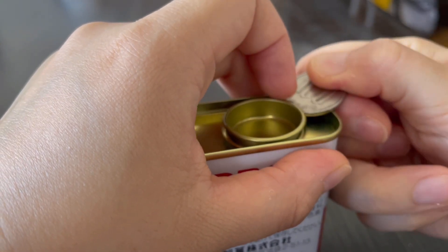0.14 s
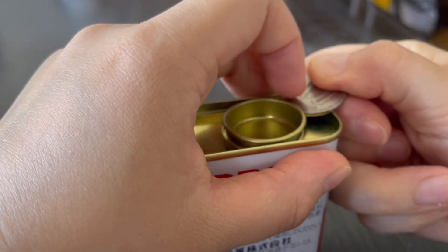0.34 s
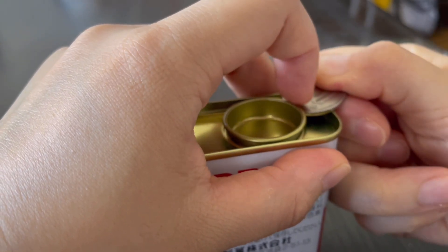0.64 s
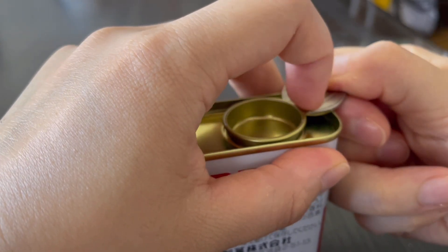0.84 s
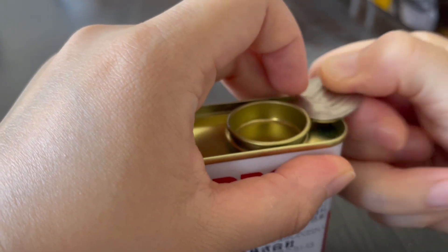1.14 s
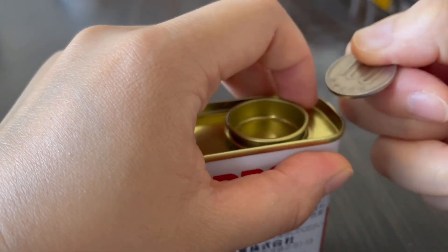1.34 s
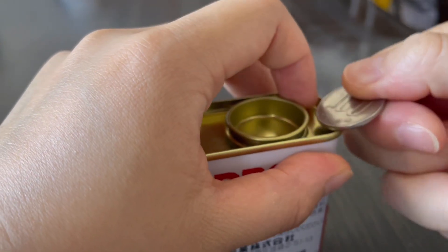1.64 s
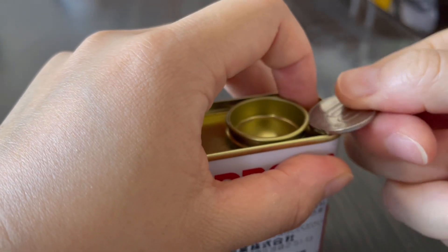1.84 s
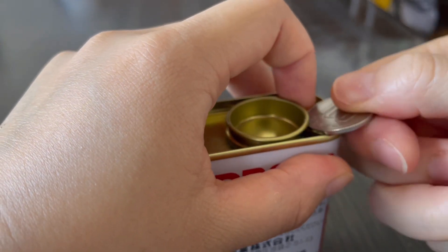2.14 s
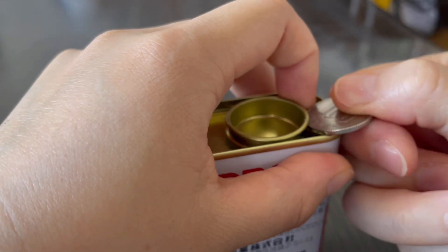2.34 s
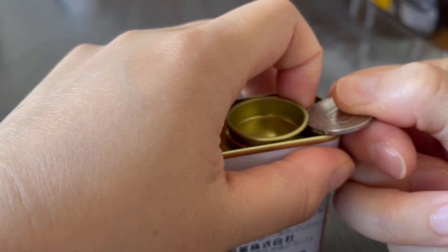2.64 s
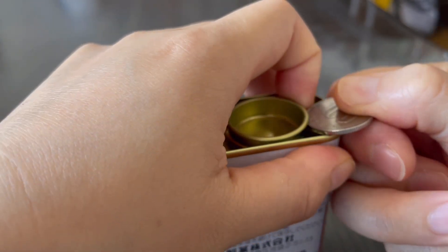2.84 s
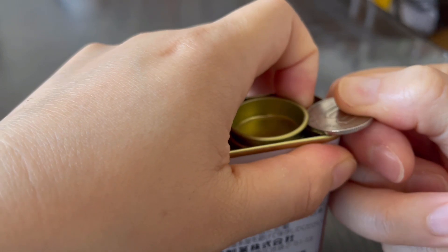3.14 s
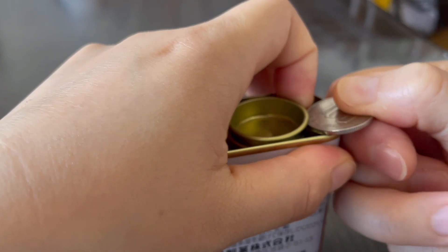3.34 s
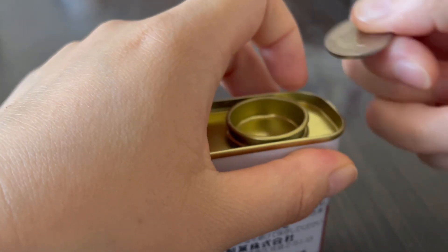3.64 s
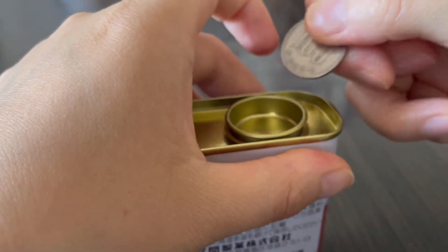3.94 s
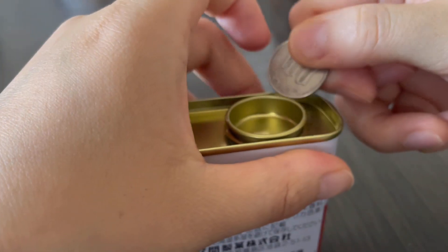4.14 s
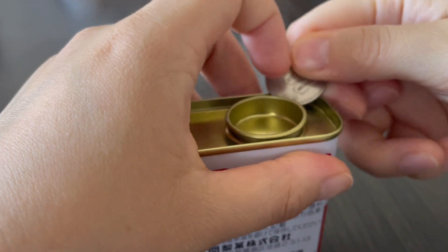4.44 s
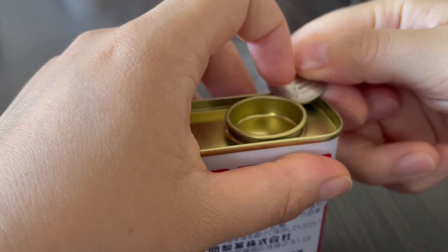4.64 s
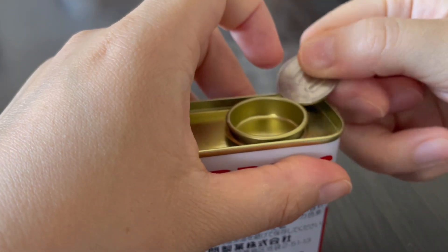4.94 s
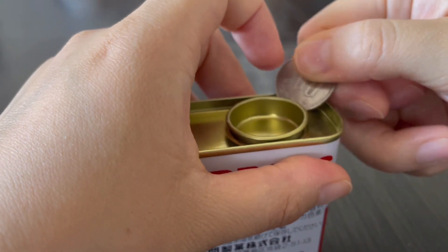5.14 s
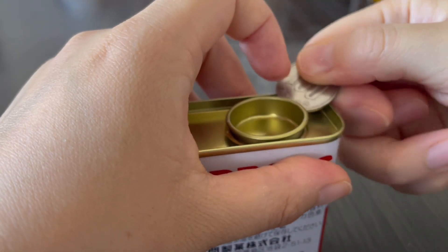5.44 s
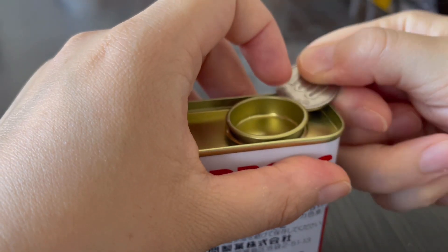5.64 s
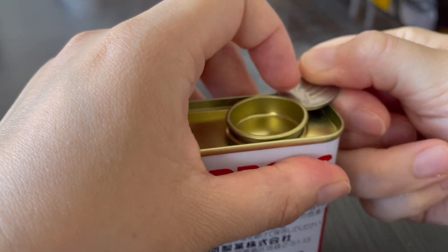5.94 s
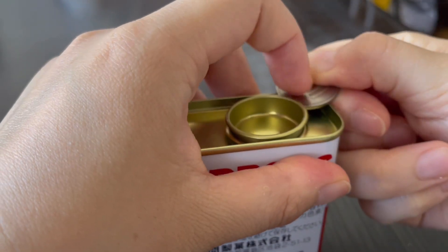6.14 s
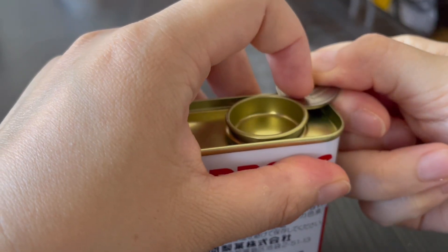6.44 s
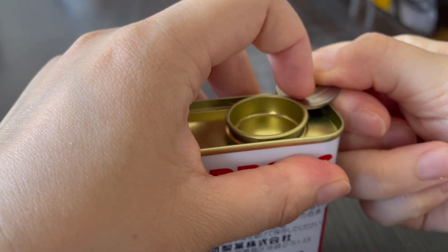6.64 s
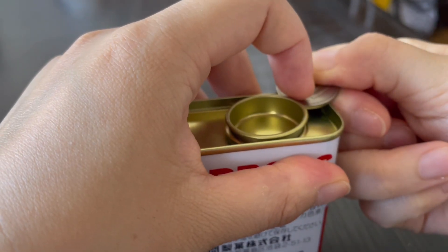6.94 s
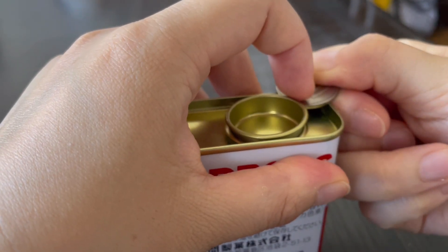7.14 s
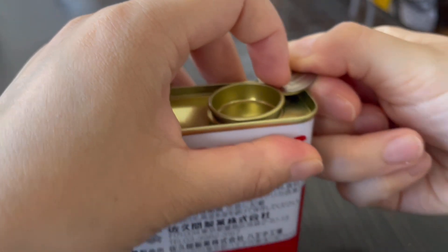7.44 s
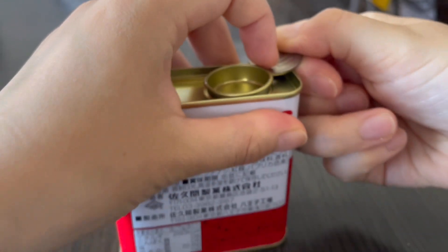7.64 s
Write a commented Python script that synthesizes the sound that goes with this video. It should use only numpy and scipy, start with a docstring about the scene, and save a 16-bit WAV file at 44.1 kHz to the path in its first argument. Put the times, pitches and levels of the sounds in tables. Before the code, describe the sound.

A phone close to a gripped sheet-metal tin picks up a coin prying and tapping at its rim: damped clacks, bright ticks, small low thuds and very short gritty scrapes. Two active clusters are separated by near silence, the second being strongest. Afterwards only weak ticks remain until a soft, uneven scuff of the tin on the table. Small room reflections and quiet background hiss.

```python
"""Coin on a tin

A hand holds a small sheet-metal tin close to a phone while a coin taps, slips and scrapes at the rim of its lid.
Taps set off fading tones and a noisy crack, both damped by the grip; single tones of the tin, mostly low,
ring out along with many of the contacts. Scrapes are crowds of tiny slips heard through the tin;
at the end shaped noise drags the tin across the table.
A wall and the room answer all of these, over the steady hiss and rumble of a quiet room.
"""
import sys
import numpy as np
from scipy import signal
from scipy.fft import rfft, irfft
from scipy.io import wavfile
from scipy.ndimage import uniform_filter1d

SR = 44100
rng = np.random.default_rng(int(sys.argv[2]) if len(sys.argv) > 2 else 0)


def boost_factor(decibels):
    """Convert a level in decibels to a linear amplitude factor."""
    exponent = np.asarray(decibels, float) / 20
    return 10 ** exponent


def unload_audio(sound):
    """Save the sound as a 16-bit wav file, at the path given as the first command line argument."""
    columns = np.transpose(np.atleast_2d(sound))
    # keep every value between -1 and 1, then stretch to whole-number steps
    steps = np.round(np.clip(columns, -1, 1) * 32767)
    wavfile.write(sys.argv[1], SR, steps.astype(np.int16))


N = 343093  # length in samples

# how the coin meets the tin, in order of time [hold number]:
# 0 flat under the lid, 1 upright on the rim, 2 slipping off, 3 tapping the top, 4 pressed on the lid
HOLD_ORDER = [0, 4, 1, 4, 2, 4, 3]
# when one hold gives way to the next [t/s]
HOLD_CHANGES = [4.0, 4.22, 4.6, 4.8, 4.9, 5.1]


def evened(x):
    """Scales a sound to an rms of 1."""
    return x / np.sqrt(np.mean(x ** 2) + 1e-20)


def onset_evened(x):
    """Scales a sound to an rms of 1 over its first 5 ms."""
    return x / np.sqrt(np.mean(x[:SR // 200] ** 2))


def read(points, hz):
    """Reads a spectrum table between its points, on a log-frequency axis."""
    f, value = np.transpose(points)
    return np.interp(np.log(hz + 1), np.log(f + 1), value)


def add(mix, s, sound):
    """Mixes a sound in at time s."""
    part = mix[round(s * SR):][:len(sound)]
    part += sound[:len(part)]


def coloured(db_of_hz):
    """Noise of rms 1 with the given spectrum and nothing from 15760 Hz up."""
    hz = np.fft.rfftfreq(N, 1 / SR)
    spectrum = rfft(rng.standard_normal(N)) * boost_factor(db_of_hz(hz)) * (hz < 15760)
    return evened(irfft(spectrum, N))


def hold_at(s):
    """Number of the hold at time s."""
    return HOLD_ORDER[np.searchsorted(HOLD_CHANGES, s)]


def ring(s, family_db, spread_db, rise_s=0.00055, crack_s=0.011, grit_db=0):
    """The tin answers a contact: the fingers soak up most of the motion at once, the rest rings on."""
    # modes (ringing tones) of lid and coin [f/Hz, t60/s, then level within the family/dB at each of the 5 holds]
    tin_modes = [(245, 0.1, -24, -5, -20, -9.5, -29), (490, 0.05, -14.5, -2, -1, -16.5, -24),
                 (694, 0.08, -7, -2, -10.5, -13.5, -18), (900, 0.05, -6.5, -6, -16.5, -26, -18.5),
                 (1357, 0.045, 1, 6, 4, -3, -7.5), (1506, 0.03, 4, 6, 3.5, 0, -12),
                 (1867, 0.07, 10, 1, -5, -3.5, -3.5), (2132, 0.03, -4.5, -15, 4.5, -12, -1.5),
                 (2480, 0.043, -41, 6, -25, -9, -27.5), (3675, 0.064, -7, -33, -6, -8, -3),
                 (4065, 0.062, -2.5, -27, -4.5, -1, -5), (4480, 0.06, -22, -2, -11.5, -12, -0.5),
                 (4800, 0.025, -39, -7.5, -2.5, -7, -12.5), (5224, 0.03, -7, -11, -18.5, -18, -17),
                 (5776, 0.053, 10.5, 7, -3.5, -2, 1), (6500, 0.04, -20, -26, -15.5, -7, -17),
                 (7330, 0.05, 4, -2, -1.5, -2, -14), (7710, 0.06, -23, -11, -3.5, -17, -11),
                 (8450, 0.058, 11, 5, -13, -19, -2.5), (8000, 0.06, 2, -1, -27.5, -10, -10),
                 (8940, 0.0407, 2, 6, 2.5, -7, -7), (9480, 0.017, -26, -16, -3.5, 0, -7.5),
                 (9850, 0.05, -2, -18, -7, -4, -0.5), (10360, 0.05, 4, -12, 1.5, -12, 1),
                 (11400, 0.05, 3.5, -20, -2.5, 0.5, -11), (12930, 0.05, -2, -14, -13, 2, -17),
                 (13330, 0.06, 8, -16, -17, -4.5, -7), (13520, 0.06, -24, -2.5, -2.5, 2.5, -6.5),
                 (14600, 0.02, 8, -16, -20, -13, -18.5), (15500, 0.036, -7.5, -33, -33, -21.5, -19.5)]
    # borders between the five families of modes, which a blow excites unequally [f/Hz]
    family_borders = [2900, 5150, 7850, 9750]
    # finger damping, a row per hold [share that rings on/dB, t60 of the rest/s, crack over modes before grit/dB]
    grip = [(-19.5, 0.0107, -5.5), (-14, 0.0074, -7), (-29, 0.01, -6.5), (-23, 0.008, -5.5),
            (-21, 0.018, -6.5)]
    # colour of the crack of contact [f/Hz, relative level/dB]
    crack_colour = [(300, -21), (900, -12), (1300, -6.5), (2250, -3), (2700, -17.5), (3500, 7.5),
                    (14000, 0.5), (16500, -30.5)]
    hold = hold_at(s)
    hz, t60, *mode_db = np.transpose(tin_modes)[..., None]
    share_db, grip_s, crack_db = grip[hold]
    t = np.arange(5000) / SR
    rise = (1 - np.exp(-t / rise_s)) ** 2
    fade = (boost_factor(-60 * t / grip_s) + boost_factor(share_db - 60 * t / t60)) * rise

    # no two contacts land on quite the same spot: levels and pitches vary a little
    level_draw, pitch_draw = rng.standard_normal((2, len(tin_modes), 1))
    tones = np.sin(2 * np.pi * hz * (1 + 0.0027 * pitch_draw) * t)
    modes = boost_factor(mode_db[hold] + spread_db * level_draw) * fade * tones
    modes[::2] *= -1  # neighbouring modes start in opposite directions
    mode_family = np.searchsorted(family_borders, hz[:, 0])

    # countless small modes between the strong ones merge into a brief noisy crack
    noise_hz = np.fft.rfftfreq(len(t), 1 / SR)
    noise = rfft(rng.standard_normal(len(t))) * boost_factor(read(crack_colour, noise_hz))
    noise_family = np.searchsorted(family_borders, noise_hz)
    crack_fade = (boost_factor(-60 * t / crack_s) + boost_factor(-23.5 - 60 * t / 0.07)) * rise

    out = np.zeros(len(t))
    for k, level_db in enumerate(family_db):
        crack = irfft(noise * (noise_family == k), len(t)) * crack_fade
        part = onset_evened(modes[mode_family == k].sum(0))
        part = part + boost_factor(crack_db + grit_db) * onset_evened(crack)
        out += boost_factor(level_db) * onset_evened(part)
    return out


def blows():
    """Each contact sets the modes ringing; a harder contact is quicker and reaches the higher families."""
    # coin meets tin [t/s, level of the lowest family/dB, hardness/dB per octave, extra for the second family/dB]
    contacts = [(0.8556, -62.5, -3.5, -1), (0.9378, -70.5, -3.0, 4.0), (1.0292, -64, -7, 8),
                (1.139, -46.5, -7.5, -3), (1.1425, -48.5, -5.5, 1), (1.1581, -52, -5.5, 1),
                (1.3338, -72.5, -2, 5), (1.357, -62, -4, 4), (1.595, -54.0, -3.5, 2),
                (1.666, -62, -8.5, 1.0), (1.677, -64, -5.0, 7), (1.7831, -35.0, -1.5, 3.0),
                (1.788, -39, -2.5, 8.0), (1.987, -44.5, -6.0, 0), (2.0916, -39.5, -1.0, 10),
                (2.7844, -64.5, -6, 2), (3.3475, -86, 5.0, -8.0), (3.3832, -79, 4, -4.5),
                (3.3987, -62.5, -3, 0), (3.426, -77, 2, 2.0), (3.434, -78.0, 1.5, 0.0),
                (3.47, -56.5, -7, 12), (3.504, -55.0, -7.5, 0), (3.6207, -62, -5, -2),
                (4.2083, -36, -8, -3), (4.2295, -55.5, -0.5, 7), (4.4381, -42.5, -0.5, 3.5),
                (4.65, -68, -1.5, -6), (4.7521, -39.5, -8.5, -12.5), (4.8156, -42.5, -8, -1.0),
                (4.8193, -26.5, 1.5, -9.0), (4.925, -55, -8, -10.0), (4.9476, -55, -8.0, -9.5),
                (5.0074, -54, -9.5, -6), (5.0216, -42.5, -5.0, -11.5), (5.3071, -40.5, -0.5, -1),
                (5.9636, -63, -0.5, -22.0), (6.1415, -67.5, -6, 1), (6.5105, -70, -5, -5.0),
                (6.6103, -80, 3, -11.5), (6.9243, -65, -9, -11.5), (7.07, -58, -8.5, -18.5)]
    # how far each of the five families lies above the lowest [octaves]
    family_octaves = np.log2(np.array([1600, 4000, 6400, 8700, 12000]) / 1600)
    # what each hold adds, a row per hold [third family/dB, fourth family/dB]
    hold_favours = [(-0.7, 3), (5, 10.5), (-2.5, 0.5), (-1.5, 7.5), (-1, -5)]
    out = np.zeros(N)
    for s, db, hardness_db, second_db in contacts:
        favour_db = [0, second_db, *hold_favours[hold_at(s)], 0]
        family_db = db + hardness_db * family_octaves + favour_db
        rise_s = 0.000255 * boost_factor(-1.1 * hardness_db)  # softer contacts rise more slowly
        add(out, s, ring(s, family_db, spread_db=4.0, rise_s=rise_s))
    return out


def single_tones():
    """Single tones of the tin, low thuds to high rings, many sounding along with a coin contact, each dying away."""
    # tones of the tin [t/s, level before rise and fade/dB, f/Hz, t60/s]
    tones = [(0.794, -48.5, 256, 0.024), (.856, -52, 240, 0.041), (.937, -51, 251, 0.042),
             (1.117, -54, 694, 0.073), (1.354, -43, 252, 0.021), (1.677, -48.5, 908, 0.076),
             (2.09, -41.5, 245, 0.043), (2.091, -42, 90, 0.034), (3.399, -51, 4420, 0.031),
             (3.505, -40.5, 926, 0.028), (3.507, -46.5, 1860, 0.11), (3.644, -49.5, 891, 0.078),
             (4.652, -47, 141.3, 0.045), (4.689, -42.5, 307, 0.019), (4.823, -39, 690, 0.07),
             (5.024, -54, 8070, 0.045), (5.239, -54, 800, 0.023), (5.307, -45.5, 238, 0.071),
             (5.963, -56, 302.3, 0.033), (6.142, -51.5, 258.5, 0.034), (6.508, -54.5, 395.5, 0.016),
             (6.924, -54.5, 638, 0.039), (7.07, -48, 239, 0.077), (7.072, -44, 490, 0.017)]
    out, t = np.zeros(N), np.arange(5000) / SR
    for s, db, hz, t60 in tones:
        rise = (1 - np.exp(-t / 0.001)) ** 2
        add(out, s, boost_factor(db - 60 * t / t60) * np.sin(2 * np.pi * hz * t) * rise)
    return out


def scrapes():
    """Dense uneven slips of the coin's milled edge, heard through the low, middle and high modes."""
    # rubs along the rim [start t/s, length/s, pressure/dB, change over the stroke/dB, brightness/dB]
    strokes = [(1.078, .056, -74, 0, 2), (1.154, 0.017, -54, -0.5, -4.5), (1.6, .018, -55.5, -7, -10.5),
               (1.665, .027, -60.5, 9.5, -16.5), (1.925, .027, -72.5, 10.5, -7),
               (3.471, 0.039, -55, -2, -7.5), (4.652, .084, -63.5, -6, -7), (4.917, .09, -54.5, -9.5, -19),
               (5.198, .028, -71, -8, -13), (6.53, .012, -66.5, -7, -9)]
    # what a rub drives, rows for its low, middle and high part [level of each of the five families/dB]
    rubbed_families = [
        [0, -60, -60, -60, -60],
        [-60, 0, -60, -60, -60],
        [-60, -60, -2, -9.5, 0.5],
    ]
    bite_s, lift_s, edge_db = 0.008, 0.016, -21.5  # a stroke sets in and lets go, from and to this far below
    out = np.zeros(N)
    for s, length, db, change_db, bright_db in strokes:
        t = np.arange(-bite_s, length + lift_s, 1 / SR)
        corners_s = [-bite_s, 0, length, length + lift_s]
        pressure = boost_factor(db + np.interp(t, corners_s, [edge_db, 0, change_db, change_db + edge_db]))
        chance, size = rng.random((2, len(t)))
        slips = (chance < 1200 / SR) * boost_factor(-3.2 * np.log(size + 0.003))  # about 1200 slips a second
        for part_db, family_db in zip([0, bright_db - 0.3, bright_db], rubbed_families):
            body = ring(s, family_db, spread_db=3.0, grit_db=3.5)
            scale = np.sqrt(np.mean(slips ** 2) * np.sum(body ** 2))
            drive = slips * pressure * boost_factor(part_db) / scale
            add(out, s - bite_s, signal.fftconvolve(drive, body))
    return out


def slide():
    """Fine friction noise lifted at the rings of the base; it swells in patches as the pressure shifts."""
    # the drag over the table starts, builds up, eases and stops [t/s, level before the tremble/dB]
    drag = [(7.172, -85), (7.264, -63.5), (7.416, -62.5), (7.438, -55.5), (7.5, -58.5), (7.66, -60.5),
            (7.712, -76)]
    # colour of the friction [f/Hz, relative level/dB]
    rub_colour = [(88, -44.5), (150, -2.5), (411, -5.5), (500, -2.5), (844, -6.5), (1570, -4),
                  (3040, -19.5), (3760, -12), (13500, -17), (15700, -25)]
    # rings of the base [f/Hz, width/Hz, lift/dB]
    base_rings = [(690, 52, 4), (258, 39, 7.2), (490, 21, 6.5), (1050, 100, 3.9), (1330, 660, 5.6),
                  (1842, 340, 3.9), (3660, 540, 9.7), (5440, 770, 6.8), (6260, 250, 4), (7250, 330, 11),
                  (9150, 440, 5), (11800, 420, 6.9), (12500, 500, 5)]

    def colour_db(hz):
        lifts = [db / (1 + (2 * (hz - f) / w) ** 2) for f, w, db in base_rings]
        return read(rub_colour, hz) + sum(lifts)

    z = signal.stft(coloured(colour_db), nperseg=256)[2]
    # random swells, smoothed over time and then over frequency
    patches = uniform_filter1d(rng.standard_normal(z.T.shape), size=9, axis=0)
    patches = evened(uniform_filter1d(patches, size=8, axis=1))
    rub = evened(signal.istft(z * boost_factor(2.2 * patches.T), nperseg=256)[1][:N])
    tremble_db = evened(uniform_filter1d(rng.standard_normal(N), 300))
    s, db = np.transpose(drag)
    return rub * boost_factor(np.interp(np.arange(N) / SR, s, db, -120, -120) + tremble_db)


def room(x):
    """Adds a smeared echo from the nearest wall, and a tail whose bands die at their own speeds."""
    # how long the tail lasts [f/Hz, t60/s]
    tail_times = [(300, 0.24), (800, 0.219), (2000, 0.17), (8000, 0.18), (15000, 0.13)]
    # colour of the tail [f/Hz, relative level/dB]
    tail_colour = [(300, -2.5), (900, -3), (2500, -4), (14000, -8)]
    wall_s, wall_db, tail_db = 0.0165, -25, -17
    t = np.arange(SR // 2) / SR
    taps, wall = rng.standard_normal((2, len(t)))
    hz, frame_s, z = signal.stft(taps * (1 - np.exp(-t / 0.0025)), SR, nperseg=256)
    fade_db = read(tail_colour, hz)[:, None] - 60 * frame_s / read(tail_times, hz)[:, None]
    tail = signal.istft(z * boost_factor(fade_db), SR, nperseg=256)[1][:len(t)]
    wall = wall * np.exp(-((t - wall_s) / 0.00043) ** 2)  # a burst around the wall's delay
    answer = boost_factor(tail_db) * tail / np.linalg.norm(tail)
    answer = answer + boost_factor(wall_db) * wall / np.linalg.norm(wall)
    return x + signal.fftconvolve(x, answer)[:N]


def hush():
    """Room and microphone noise: steady hiss over a low rumble, from shaped random noise."""
    # colour of the noise [f/Hz, relative level/dB per Hz]
    hush_colour = [(8.8, -30.5), (15, 7), (32, -11.5), (65, -8.5), (150, -17), (184, -15), (371, -21),
                   (527, -21), (592, -23), (972, -25), (1190, -27), (10300, -34), (16000, -33.5)]
    return boost_factor(-63.5) * coloured(lambda hz: read(hush_colour, hz))


def scene():
    """Tin sounds in the room, over the background, as one channel."""
    tin = blows() + single_tones() + scrapes() + slide()
    return (room(tin) + hush())[None]


def low_pass(x):
    """Removes everything above the highest recorded frequency."""
    return signal.sosfilt(signal.butter(12, 16530, fs=SR, output="sos"), x)


def record(dry):
    """The finished mix as the phone keeps it."""
    return low_pass(dry)


dry = scene()
out = record(dry)
unload_audio(out)
```